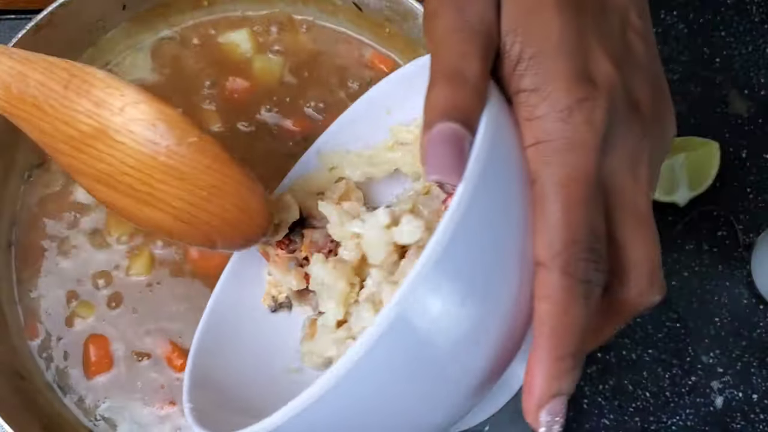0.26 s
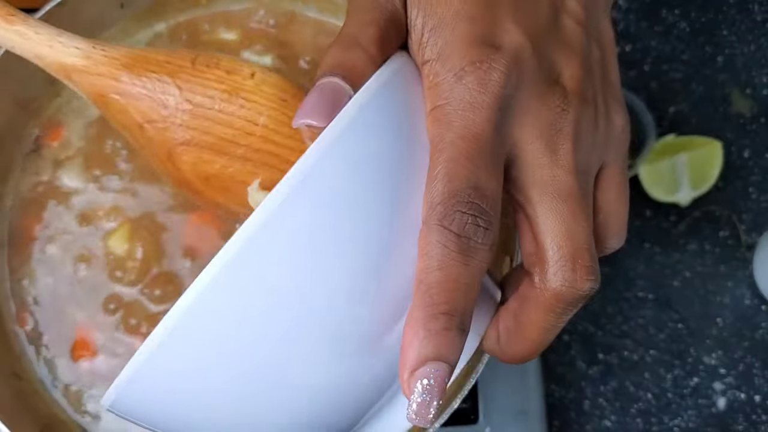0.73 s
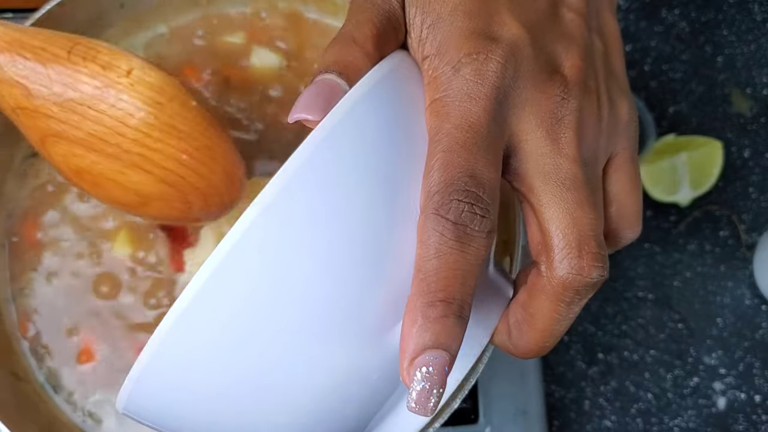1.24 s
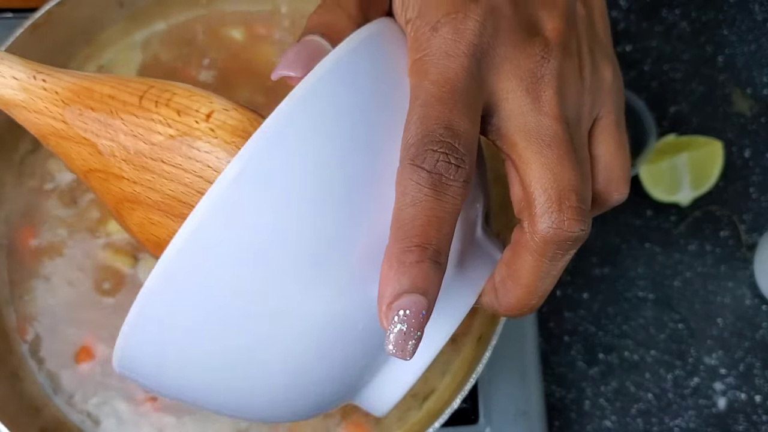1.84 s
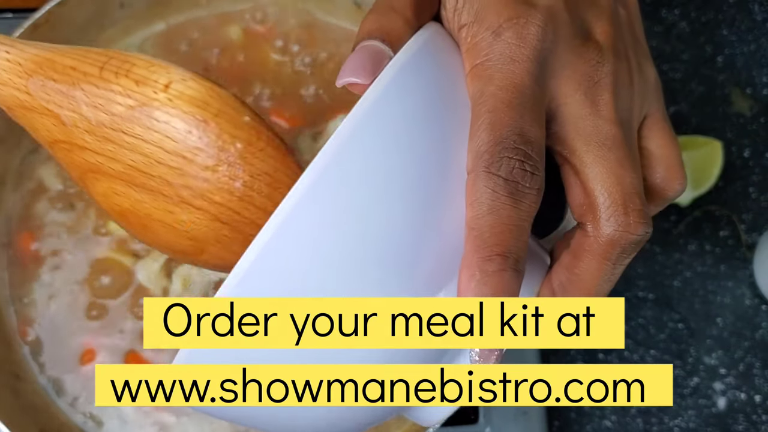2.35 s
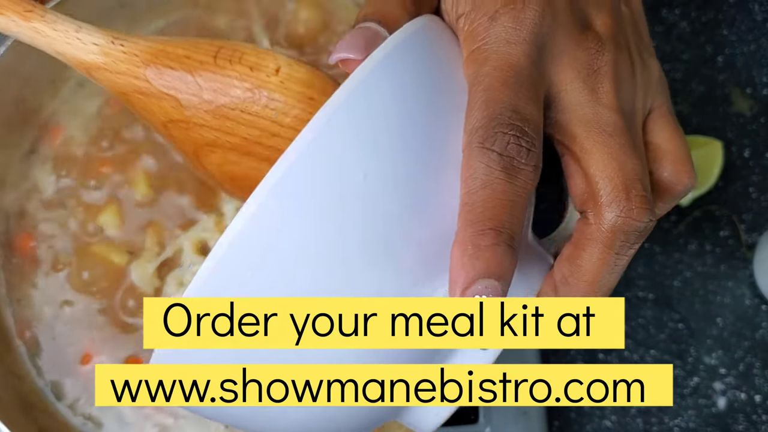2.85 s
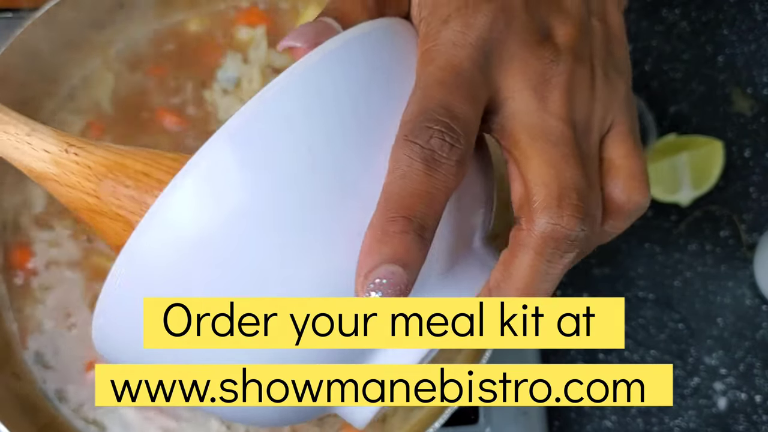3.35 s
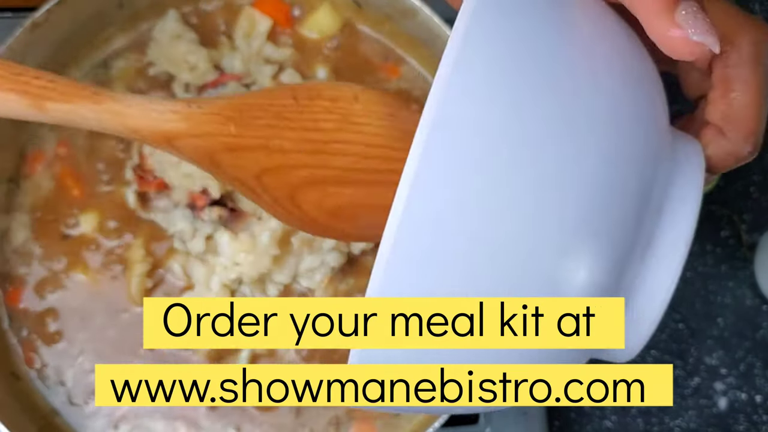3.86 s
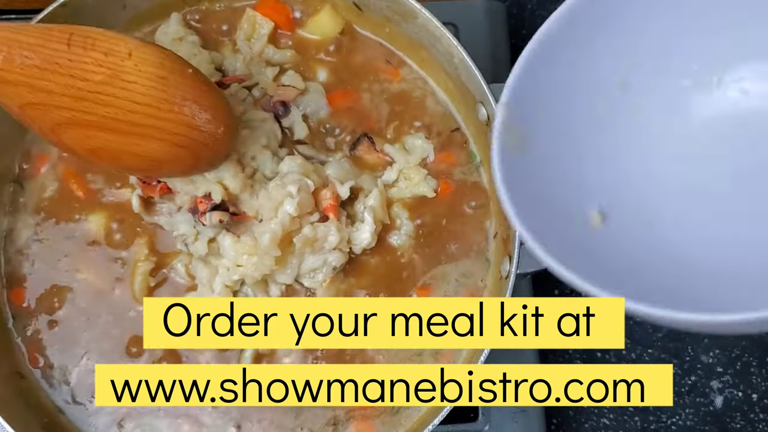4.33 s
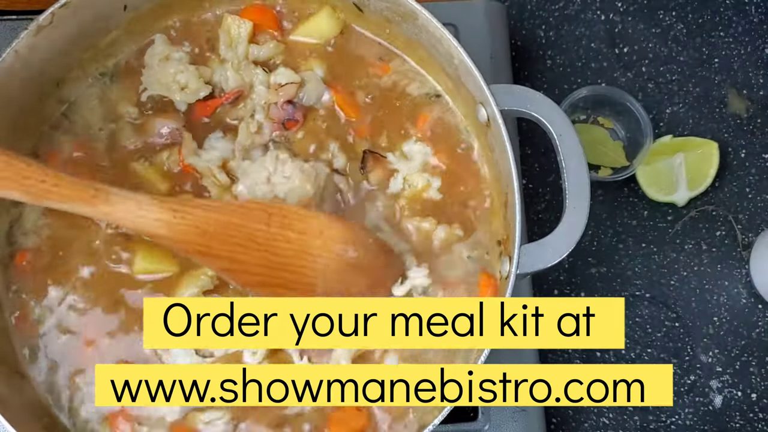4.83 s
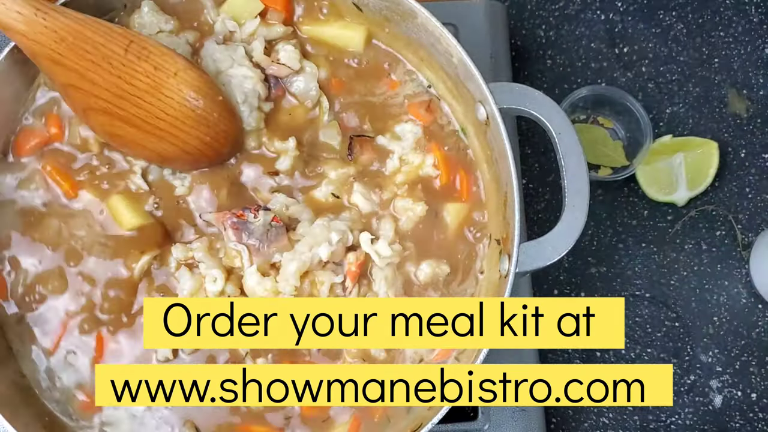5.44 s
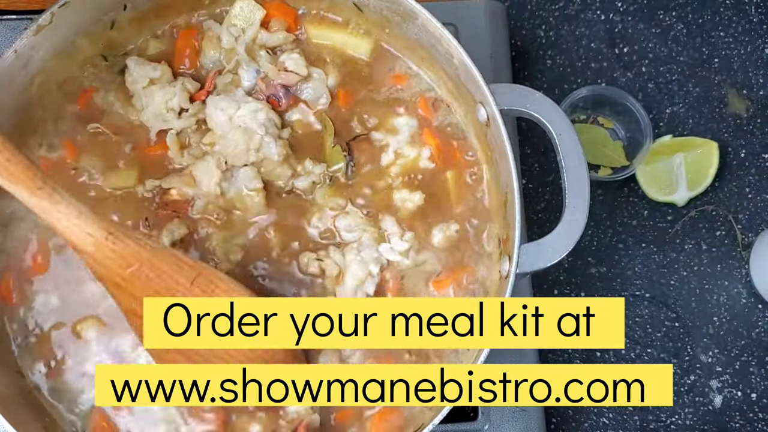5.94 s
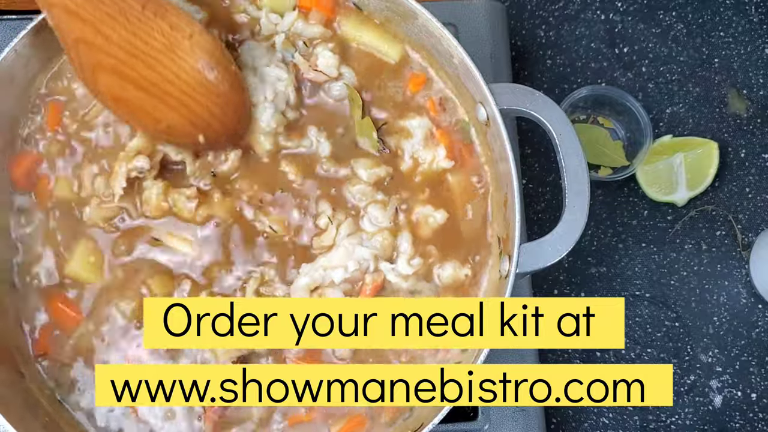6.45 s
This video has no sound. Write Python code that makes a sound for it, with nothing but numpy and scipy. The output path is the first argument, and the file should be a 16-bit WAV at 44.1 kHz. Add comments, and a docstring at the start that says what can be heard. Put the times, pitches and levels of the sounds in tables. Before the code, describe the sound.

Close, wet simmering with sticky stirring, a sharp wooden knock and dropping lumps, ending with an empty bowl clinking and thudding onto a hollow worktop.

```python
"""Thick stew simmers in a pot on a gas ring, close by, in a small kitchen: damped bubble blips over a noise bed.
A wooden spoon squelches through it (crackle, smacks), rasps along a bowl (stick-slip noise)
and knocks bowl and pot (cracks with ringing modes); a lump drops in; the pot thrums (low sine and noise).
The gas ring hisses (shaped noise). Near the end the empty bowl is set down on the worktop with a clink
and a hollow thud (impacts and modes) and rocks to rest."""
import sys
import numpy as np
from scipy import signal
from scipy.fft import rfft, irfft, next_fast_len
from scipy.io import wavfile

SR = 44100
rng = np.random.default_rng(int(sys.argv[2]) if len(sys.argv) > 2 else 0)


def waveform_to_disk(signal):
    """Save audio, clipped to [-1, 1], as 16-bit WAV at the path in sys.argv[1]."""
    frames = np.transpose(np.atleast_2d(signal))
    scaled = np.clip(frames, -1, 1) * 32767
    samples = np.round(scaled).astype(np.int16)
    wavfile.write(sys.argv[1], SR, samples)


N = 295029

# left-right likeness of the sound field: (frequency [Hz], correlation [-1..1])
LIKENESS = [(100, .94), (280, .9), (550, .45), (1000, .05), (2000, .2), (4000, .25), (10000, 0)]
# kitchen reverberation: (frequency [Hz], t60 [s])
ROOM_DECAY = [(100, 0.48), (400, 0.37), (1000, 0.19), (3000, 0.35), (10000, 0.24)]
# spectrum of wet food being rubbed: (frequency [Hz], relative density [dB])
WET_SPECTRUM = [(200, -2), (1000, 10), (2000, 6.5), (2700, -1.5), (3800, 3.5), (6000, -4), (8000, -3),
                (11000, -3.5)]


def amp(db):
    """Decibels to gain."""
    return 10 ** (np.asarray(db) / 20)


def unit(x):
    """Scale to rms 1."""
    return x / np.sqrt(np.mean(x ** 2) + 1e-20)


def along(points, hz):
    """Interpolate (Hz, value) points on a log frequency axis."""
    f, v = np.transpose(points)
    return np.interp(np.log(hz + 1), np.log(f + 1), v)


def add(track, start_s, sound):
    """Mix a sound into a track at start_s."""
    part = track[..., max(0, round(start_s * SR)):][..., :sound.shape[-1]]
    part += sound[..., :part.shape[-1]]


def filtered(x, response):
    """Apply a frequency response through a zero-padded FFT."""
    n = x.shape[-1]
    m = next_fast_len(n + SR // 4)
    return irfft(rfft(x, m) * response(np.fft.rfftfreq(m, 1 / SR)), m)[..., :n]


def coloured(x, spectrum, size=4096):
    """Causal minimum-phase filter of energy 1 with the given spectrum."""
    level_db = along(spectrum, np.fft.rfftfreq(size, 1 / SR))
    cepstrum = irfft(np.log(amp(level_db)))
    cepstrum[1:size // 2] *= 2  # fold the cepstrum onto positive time
    cepstrum[size // 2 + 1:] = 0
    kernel = irfft(np.exp(rfft(cepstrum)))
    kernel /= np.linalg.norm(kernel)
    return signal.fftconvolve(x, kernel[None], axes=1)[:, :x.shape[1]]


def half_angle(hz):
    """Half the angle whose cosine is the left-right likeness."""
    return np.arccos(np.clip(along(LIKENESS, hz), -1, 1)) / 2


def diffuse(pair):
    """Two unrelated signals become a sound field: alike in the bass, apart in the treble."""
    def mid_side_gain(hz):
        return np.array([np.cos(half_angle(hz)), np.sin(half_angle(hz))])

    mid, side = filtered(pair, mid_side_gain)
    return np.array([mid + side, mid - side])


def diffuse_noise(n):
    """White stereo noise with the field's left-right likeness."""
    return diffuse(rng.standard_normal((2, n)))


def dying(decay):
    """Half a second of stereo noise in which each frequency dies at its own t60."""
    hz, t, z = signal.stft(diffuse_noise(SR // 2), SR, nperseg=256)
    fade = amp(-60 * t / along(decay, hz)[:, None])
    return signal.istft(z * fade, SR, nperseg=256)[1][:, :SR // 2]


def placed(x, left_db, lag_ms):
    """A near source reaches the left channel earlier and louder."""
    side = np.array([[1], [-1]]) / 2
    lag_s = lag_ms * 10 ** -3
    return amp(side * left_db) * filtered(x, lambda hz: np.exp(2j * np.pi * hz * side * lag_s))


def kitchen(x, size=22000):
    """Room answer as convolution with dying noise, redrawn for every block of size samples."""
    wet = np.zeros((2, N))
    onset = 1 - np.exp(-np.arange(SR // 2) / SR / 0.00052)
    for start in range(0, N, size):
        tail = dying(ROOM_DECAY) * onset
        tail /= np.linalg.norm(tail[0])
        add(wet, start / SR, signal.fftconvolve(x[None, start:start + size], tail, axes=1))
    return wet


def blips(start_s, db, hz, swell_cycles, size=1000):
    """Heavily damped cavities: each peaks swell_cycles after its start, then dies away."""
    cycles = hz[:, None] * np.arange(size) / SR
    age = cycles / swell_cycles
    envelope = age ** 2 * np.exp(2 - 2 * age)
    waves = -amp(db)[:, None] * envelope * np.cos(2 * np.pi * cycles)
    first = np.round(np.abs(start_s) * SR).astype(int)
    index = first[:, None] + np.arange(size)
    return np.bincount(index.ravel(), waves.ravel(), N)[:N]


def swarm(pitch_hz, spread, scatter_db, swell_cycles, count, size=1000):
    """Many small blips at random times, rms 1; spread is in log pitch."""
    chance = rng.standard_normal((count, 2))
    start_s = rng.uniform(0, N / SR, count)
    db = scatter_db * np.minimum(chance[:, 0], 2)
    hz = pitch_hz * np.exp(spread * chance[:, 1])
    return unit(blips(start_s, db, hz, swell_cycles, size=size))


def ringing(modes, attack_s):
    """Decaying modes struck at once, at a different phase in each channel."""
    t = np.arange(SR // 2) / SR
    out = np.zeros((2, len(t)))
    for hz, db, t60 in modes:
        apart = half_angle(hz) * np.array([[1], [-1]])
        out += amp(db - 60 * t / t60) * np.sin(2 * np.pi * (hz * t + rng.random()) + apart)
    return out * (1 - np.exp(-t / attack_s))


def impact(push, t60_s):
    """One firm push followed by a brief rattle of the touching surfaces."""
    t = np.arange(SR // 2) / SR
    return push * (t == 0) + diffuse_noise(len(t)) * amp(-60 * t / t60_s)


def burner():
    """The gas ring hisses steadily as shaped noise and sings faintly near 2 kHz in its ports."""
    # (frequency [Hz], relative density [dB])
    flame = [(25, -32), (55, 6), (90, 3.5), (140, 5.5), (300, -1.5), (450, -11), (900, -9.5), (1250, -16),
             (1750, -4.5), (2200, -14), (2500, -22.5), (5500, -15.5), (7100, -12), (8200, -17.5),
             (11000, -26)]
    hiss = amp(-65.5) * coloured(diffuse_noise(N), flame)
    song = filtered(diffuse_noise(N), lambda hz: 1 / (1 + ((hz - 2015) / 55) ** 2))
    return hiss + amp(-71.5) * unit(song)


def rocking(count=6):
    """(time [s], level [dB]) of the bowl's foot touching, ever closer together and weaker."""
    start_s, first_gap_s, shrink = 6.115, 0.043, 0.74
    first_db, loss_db = -59.5, 0.3  # loss at each touch
    k = np.arange(count)
    gaps_s = first_gap_s * shrink ** k
    return zip(start_s + np.cumsum(gaps_s) - gaps_s, first_db - loss_db * k)


def bowl_down():
    """The bowl's foot clinks, booms through the modes of the worktop and rocks to rest."""
    # modes of the glaze: (frequency [Hz], level [dB], t60 [s])
    glaze = [(2880, -25.5, 0.12), (3440, -7.5, 0.22), (3526, -4.5, 0.16), (3565, -0.5, 0.13),
             (3700, -5, 0.177), (3610, -7.5, 0.15), (3770, -8.5, 0.2), (4380, -18, 0.13),
             (5060, -17.5, 0.41), (5220, -14, 0.22)]
    # modes of the hollow worktop: (frequency [Hz], level [dB], t60 [s])
    worktop = [(106.5, -11.5, 0.68), (150.6, -4.5, 0.5), (205, -2, 0.38), (260, 0.5, 0.32),
               (308.6, -12, 0.67), (424, 0.5, 0.21), (440.4, -13.5, 0.98), (563, -4, 0.26),
               (600, -11.5, 0.21), (670, -2, 0.37), (710, -1, 0.3), (757, -4.5, 0.3), (807, 0.5, 0.34),
               (835, -4, 0.3), (876, 2, 0.36), (907, 1, 0.28), (1050, -0.5, 0.39), (1289, 4, 0.15),
               (1400, -9, 0.32)]
    # (frequency [Hz], relative density [dB])
    clink = [(1500, -54.5), (2900, -17.5), (3550, 4), (3900, -2), (4230, 3), (4550, -35), (5100, -15.5),
             (6500, -17), (11000, -26.5)]
    # (frequency [Hz], relative density [dB])
    thud = [(25, -42.5), (50, -7), (100, -8.5), (250, -6.5), (500, -0.5), (850, 3), (1280, 1),
            (1650, -12.5), (2050, -10.5), (2800, -28), (5000, -15.5), (8000, -39), (12000, -51)]
    # (frequency [Hz], t60 [s])
    thud_decay = [(100, 0.89), (400, 0.5), (1000, 0.38), (2500, 0.39), (10000, 0.18)]
    out = np.zeros((2, N))
    for start_s, db in [(5.962, -26), (5.968, -24.5)]:
        touch = impact(push=3.0, t60_s=0.02) + amp(-10.0) * dying(ROOM_DECAY)
        add(out, start_s, amp(db) * coloured(touch, clink))
    add(out, 5.963, amp(-28.0) * ringing(glaze, attack_s=0.001))
    landing = amp(-20.5) * impact(push=6, t60_s=0.031) + amp(-25.0) * dying(thud_decay)
    add(out, 5.9678, coloured(landing, thud))
    add(out, 5.968, amp(-30.5) * ringing(worktop, attack_s=0.0068))
    for start_s, db in rocking():
        touch = ringing(glaze, attack_s=0.0021) + amp(-7.5) * ringing(worktop, attack_s=0.0046)
        add(out, start_s, amp(db) * touch)
    return out * amp([[-0.8], [0.8]])  # slightly to the right


def pot():
    """Pushed by the spoon, the heavy pot thrums on its stand: a low tone with juddering noise."""
    # (time [s], level [dB], length [s], pitch [Hz])
    thrums = [(1.069, -52, 0.17, 78.7), (1.267, -59.5, .2, 71.7), (4.488, -49.5, 0.16, 77.2),
              (5.677, -48, 0.16, 73.5), (5.851, -48.5, 0.11, 77.5)]

    def judder_band(f):
        return 1 / (1 + (f / 150) ** 4) * f * f / (f * f + 45 ** 2)

    out = np.zeros((2, N))
    for start_s, db, length_s, hz in thrums:
        t = np.arange(int(length_s * SR)) / SR
        judder = unit(filtered(rng.standard_normal(len(t)), judder_band))
        arch = np.sin(np.pi * t / length_s) ** 0.4
        add(out, start_s, amp(db) * arch * (np.sin(2 * np.pi * hz * t) + 0.46 * judder))
    return out


def knocks_and_thump():
    """Wood on bowl or pot, and the dull thump of a lump dropping at 3.713 s: crack, modes, room ring."""
    # (time [s], level [dB], low-pass cutoff [Hz], relative room ring [dB])
    blows = [(1.6845, -20.5, 6400, -13), (3.7133, -36, 790, 0), (3.884, -45, 5000, -22),
             (5.019, -42.5, 4970, -8), (5.201, -50, 5000, -4.5), (5.478, -41, 1950, 4),
             (5.7302, -38, 3500, 2), (5.738, -39.5, 4500, -4), (5.772, -34.5, 3600, -3),
             (5.779, -43, 4500, -4.5)]
    # spectrum of the blow: (frequency [Hz], relative density [dB])
    wood = [(25, -46.5), (60, -25), (180, -2.5), (400, 2), (560, -5), (800, 0), (1100, 1), (1550, -6.5),
            (1950, -9.5), (2350, -9), (2750, -9), (3500, -11), (6200, -8), (7800, -22), (12000, -35)]
    # modes of the struck vessel: (frequency [Hz], level [dB], t60 [s])
    vessel = [(320, -3, 0.18), (435, -11, 0.21), (700, -6, 0.23), (1355, -3.5, 0.28), (1910, 13, 0.04),
              (2224, -6, 0.33), (2750, -0.5, 0.14)]
    out = np.zeros((2, N))
    for start_s, db, cutoff_hz, ring_db in blows:
        crack = amp(-3.0) * impact(push=6.2, t60_s=0.025)
        room = amp(ring_db - 4) * dying(ROOM_DECAY)
        blow = coloured(crack + room, wood) + amp(-21.5) * ringing(vessel, attack_s=0.00041)
        b, a = signal.butter(2, min(cutoff_hz, SR / 3), fs=SR)
        add(out, start_s, amp(db) * signal.lfilter(b, a, blow))
    return out


def scraping():
    """The spoon's edge sticks and slips along the smeared bowl: noise with a jittering grip."""
    # (time [s], length [s], level [dB])
    scrapes = [(1.495, 0.095, -58), (2.94, 0.053, -51.5), (3.009, 0.048, -51), (3.723, .11, -57.5),
               (4.416, 0.045, -56.5)]
    slips = np.zeros((2, N))
    for start_s, length_s, db in scrapes:
        t = np.arange(int(length_s * SR)) / SR
        grip = np.interp(t, np.linspace(0, length_s, num=50), amp(6 * rng.standard_normal(50)))
        arch = np.sin(np.pi * t / length_s) ** 0.5
        add(slips, start_s, amp(db) * arch * unit(grip * rng.standard_normal((2, len(t)))))
    rasp = coloured(diffuse(slips), WET_SPECTRUM)
    return rasp + amp(-5.5) * kitchen(rasp[0], size=N)


def spoon_effort():
    """Drive in dB for the food's wet noise: every stroke swells and fades in an arch."""
    # (time [s], length [s], level [dB])
    strokes = [(1.153, 0.8, -77), (2.0, 1, -75), (2.904, 0.21, -63.5), (3.285, 0.15, -67.5),
               (3.52, 0.48, -63.5), (3.99, 0.29, -72), (4.417, 0.8, -66), (5.094, 0.46, -66.5),
               (5.64, 0.81, -63.5)]
    resting_db = -79.5  # food left alone
    arch_power = 0.7  # below 1: swells quickly and holds
    t = np.arange(N) / SR
    power = amp(resting_db) ** 2
    for start_s, length_s, db in strokes:
        phase = np.clip((t - start_s) / length_s, 0, 1)
        arch = np.abs(np.sin(np.pi * phase)) ** arch_power
        power = power + (amp(db) * arch) ** 2
    return 10 * np.log10(power)


def ticks(stir_db, count=100):
    """(time [s], level [dB], pitch [Hz]) of lesser films tearing, louder the harder the spoon works."""
    mean_gap_s, over_stir_db, centre_hz = 0.085, 11.5, 5500
    chance = rng.uniform(-1.1, 1, (count, 3))
    start_s = mean_gap_s * (np.arange(count) + 1 + chance[:, 0])
    db = np.interp(start_s, np.arange(N) / SR, stir_db) + over_stir_db + 4.7 * chance[:, 1]
    return list(zip(start_s, db, centre_hz * np.exp(0.28 * chance[:, 2])))


def smack(peak_db, hz, t60_s, width_hz):
    """A wet film tears: a few milliseconds of noise in a broad resonance."""
    def resonance(f):
        return (1j * f * width_hz / (hz * hz - f * f + 1j * f * width_hz)) ** 2

    t = np.arange(SR // 20) / SR
    tear = rng.standard_normal(len(t)) * amp(-60 * t / t60_s)
    film = filtered(tear, resonance)
    return amp(peak_db) * film / np.abs(film).max()


def stirring():
    """Wet food squelches under the spoon: a fine crackle, smeared noise and single smacks."""
    # loudest films snapping: (time [s], relative level [dB], pitch [Hz])
    smacks = [(1.1653, -53.5, 6430), (1.311, -51.5, 4200), (1.479, -37, 4930), (1.513, -44, 3720),
              (1.5302, -41.5, 5440), (2.0427, -48, 5460), (2.0923, -47, 4000), (2.433, -52, 5230),
              (2.7634, -44.5, 5170), (3.03, -40.5, 6300), (3.886, -41, 4960), (4.1038, -50, 5500),
              (4.8484, -55, 7050), (5.011, -49.5, 6210), (5.4003, -43, 6500)]
    stir_db = spoon_effort()
    grains = swarm(pitch_hz=5200, spread=0.35, scatter_db=6.5, swell_cycles=1.1, count=2000, size=200)
    crackle = amp(stir_db - 2) * grains
    smear = amp(stir_db + 1.5) * coloured(diffuse_noise(N), WET_SPECTRUM)
    for start_s, db, hz in smacks + ticks(stir_db):
        add(crackle, start_s, smack(db + 6, hz, t60_s=0.018, width_hz=2560))
    near = placed(crackle, left_db=2, lag_ms=0.1)
    return near + amp(-4.5) * kitchen(crackle) + smear


def neighbours(start_s, db, hz, count=2):
    """Each big plop is joined by smaller, mostly deeper ones scattered just before or after it."""
    spread_s, mean_db, pitch_ratio = 0.021, -49.5, 0.87
    chance = rng.standard_normal((len(start_s), count, 3))
    when_s = start_s[:, None] + spread_s * chance[..., 0]
    level_db = mean_db + 0.28 * (db - db.mean())[:, None] + 1.8 * chance[..., 1]
    pitch_hz = hz[:, None] * pitch_ratio * np.exp(0.16 * chance[..., 2])
    return blips(when_s.ravel(), level_db.ravel(), pitch_hz.ravel(), swell_cycles=0.54)


def rising(simmer_db, count=120):
    """Middling bubbles surface at a loose pace, stronger as the stew boils harder."""
    mean_gap_s, over_simmer_db, centre_hz = 0.09, 14.5, 780
    chance = rng.uniform(-1, 1, (count, 3))
    start_s = mean_gap_s * (np.arange(count) + 1 + 0.7 * chance[:, 0])
    db = np.interp(start_s, np.arange(N) / SR, simmer_db) + over_simmer_db + 2.5 * chance[:, 1]
    return blips(start_s, db, centre_hz * np.exp(0.34 * chance[:, 2]), swell_cycles=1.0)


def pot_air(x):
    """The hollow over the stew booms softly after each plop: parallel resonances."""
    # (frequency [Hz], width [Hz], level [dB])
    hollows = [(305, 11.4, 6.5), (662, 48, -9.5), (1790, 200, -4.5)]

    def response(f):
        return sum(amp(db) * 1j * f * width / (hz * hz - f * f + 1j * f * width)
                   for hz, width, db in hollows)

    return filtered(x, response)


def bubbles():
    """Big bubbles and falling lumps plop as damped blips over small bubbles and a noise bed."""
    # big bubbles bursting, and a lump plopping in at 3.713 s: (time [s], relative level [dB], pitch [Hz])
    pops = [(0.0539, -49, 587), (0.3314, -49, 700), (0.432, -41.5, 1160), (0.603, -48.5, 820),
            (0.6302, -43.5, 1020), (0.9668, -45, 950), (0.999, -44.5, 790), (1.116, -41, 806),
            (1.2047, -42, 870), (1.2973, -45.5, 1010), (1.4067, -42, 834), (1.5686, -39.5, 1140),
            (1.7344, -31, 1270), (1.7933, -38, 1190), (2.122, -43.5, 1020), (2.1718, -39.5, 1090),
            (2.2756, -46, 770), (2.316, -37, 880), (2.4216, -40, 746), (2.488, -45.5, 740),
            (2.7125, -42, 710), (2.7542, -37, 1200), (2.7949, -42.5, 950), (3.0399, -39, 1050),
            (3.104, -37, 1110), (3.1245, -34.5, 1880), (3.2744, -39.5, 1570), (3.2997, -41, 724),
            (3.3279, -33.5, 940), (3.4204, -44.5, 780), (3.513, -46, 865), (3.5673, -35.5, 890),
            (3.585, -34, 980), (3.612, -39, 1200), (3.7132, -32.5, 660), (4.1181, -48.5, 594),
            (4.2639, -39, 1000), (4.4361, -41.5, 810), (4.7292, -34, 1270), (4.8124, -42, 635),
            (4.8895, -41, 1260), (5.2313, -46, 820), (5.2942, -44, 690), (5.3395, -47, 495),
            (5.4805, -40.5, 684), (5.5013, -30, 1220), (5.5976, -37.5, 870), (5.8897, -37.5, 1140),
            (6.2432, -39.5, 830), (6.464, -50, 564)]
    # further lumps of food falling in: (time [s], level [dB], pitch [Hz])
    lump_falls = [(3.3417, -34, 337), (3.8842, -43, 344)]
    # how hard the stew boils: (time [s], relative level [dB])
    boil = [(0.0, -87), (0.8, -72), (1.6, -67.5), (2.0, -66.5), (2.6, -64), (3.15, -60.5), (3.45, -66.5),
            (3.85, -61.5), (4.3, -64), (4.9, -61), (5.4, -69.5), (6.1, -58), (6.35, -76.5), (6.69, -65)]
    # simmer bed: (frequency [Hz], relative density [dB])
    simmer = [(60, -8), (140, -2), (310, 10), (450, -13.5), (700, -7), (1100, 3), (1600, -9), (2600, -16.5),
              (5000, -48)]
    boil_s, boil_db = np.transpose(boil)
    simmer_db = np.interp(np.arange(N) / SR, boil_s, boil_db)
    start_s, db, hz = np.transpose(pops)
    big_plops = amp(2.0) * blips(start_s, db, hz, swell_cycles=0.89)
    # the thick stew slumps back into each crater, later, weaker and deeper
    slumps = blips(start_s + 0.0015, db - 15.5, hz * 0.39, swell_cycles=0.73)
    lumps = blips(*np.transpose(lump_falls), swell_cycles=0.48)
    grains = swarm(pitch_hz=780, spread=0.28, scatter_db=6.0, swell_cycles=0.97, count=500)
    small = amp(simmer_db - 1) * grains
    plops = big_plops + slumps + lumps + neighbours(start_s, db, hz) + rising(simmer_db) + small
    bed = amp(simmer_db - 2.0) * coloured(diffuse_noise(N), simmer)
    near = placed(plops, left_db=2.8, lag_ms=0.17)
    return near + amp(-5.0) * kitchen(plops) + pot_air(plops) + bed


def scene():
    """Everything at the stove and the worktop."""
    return burner() + bowl_down() + pot() + knocks_and_thump() + scraping() + stirring() + bubbles()


def record(dry):
    """Steep band limit: half gain at 11.4 kHz, nothing from 12.1 kHz up."""
    half_gain_hz, stop_hz = 11400, 12100
    return filtered(dry, lambda hz: (hz < stop_hz) / (1 + (hz / half_gain_hz) ** 50))


dry = scene()
out = record(dry)
waveform_to_disk(out)
```